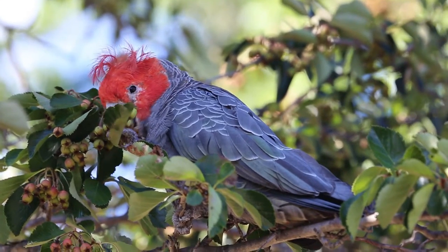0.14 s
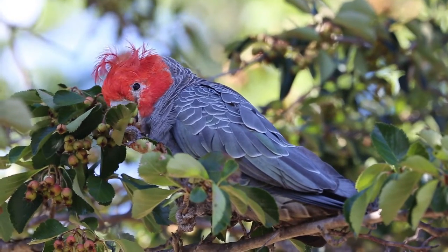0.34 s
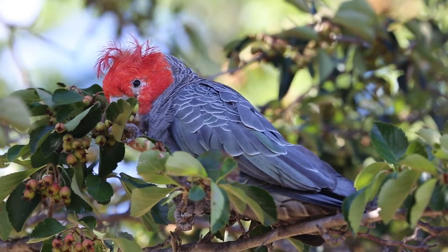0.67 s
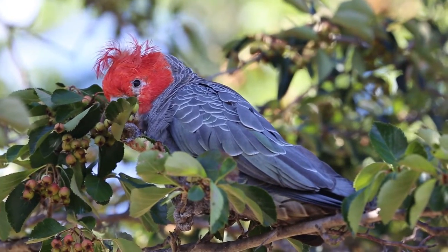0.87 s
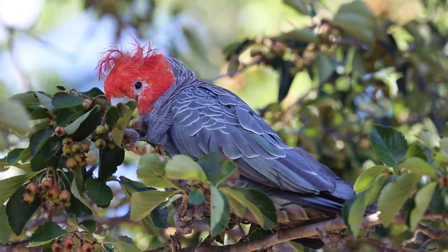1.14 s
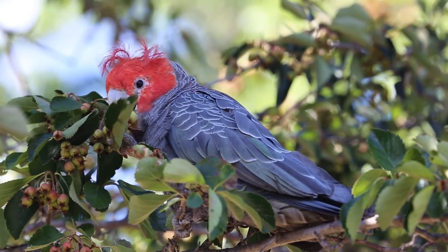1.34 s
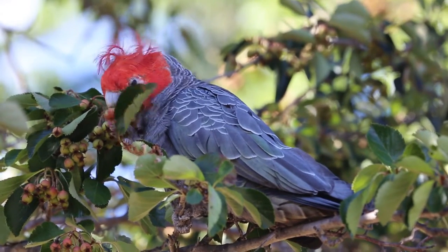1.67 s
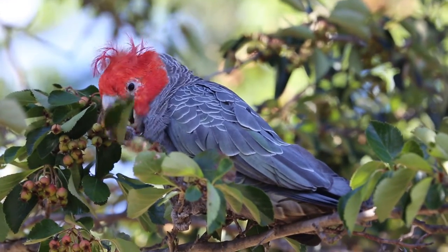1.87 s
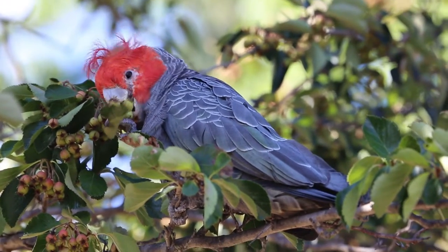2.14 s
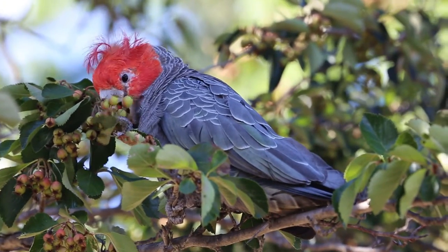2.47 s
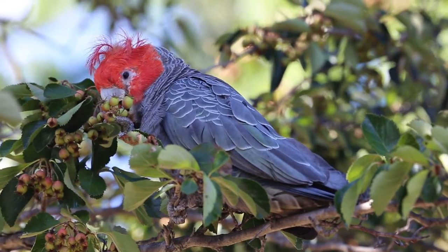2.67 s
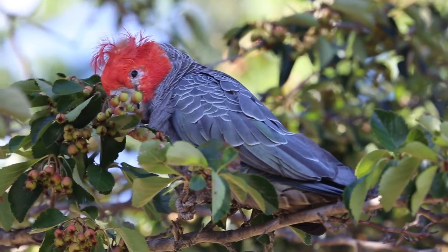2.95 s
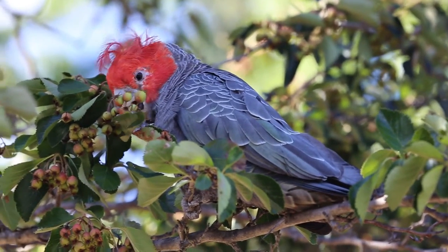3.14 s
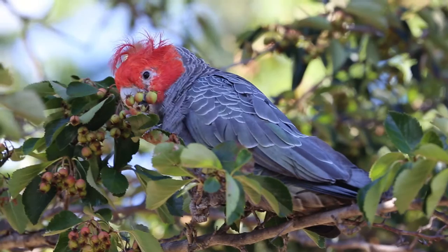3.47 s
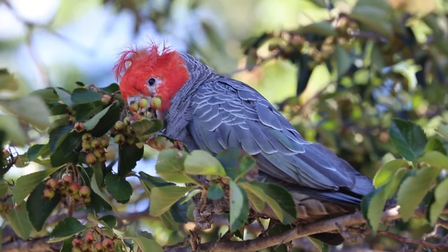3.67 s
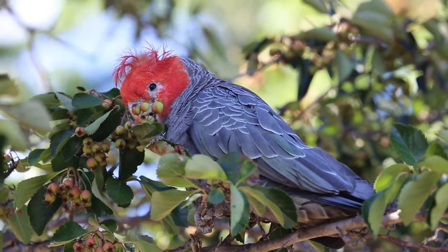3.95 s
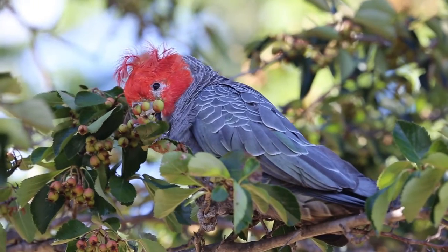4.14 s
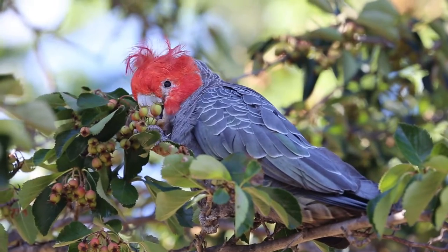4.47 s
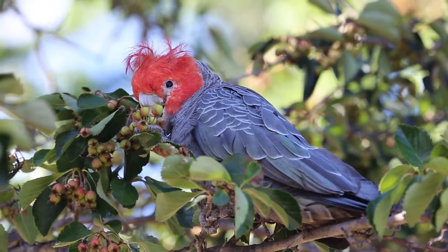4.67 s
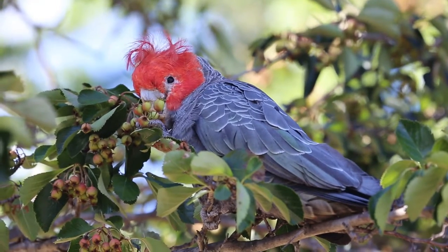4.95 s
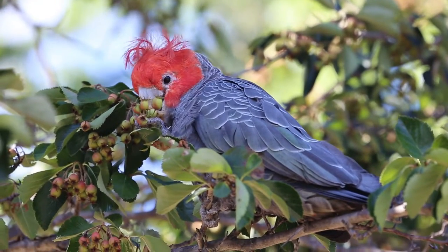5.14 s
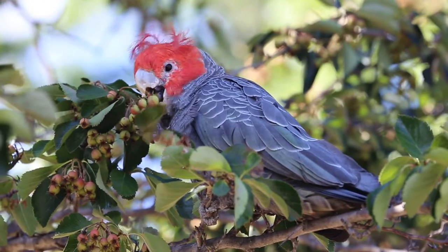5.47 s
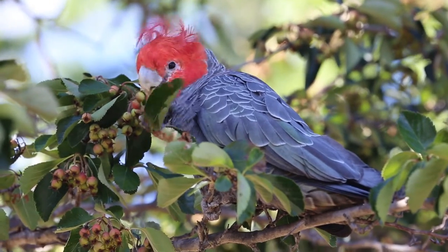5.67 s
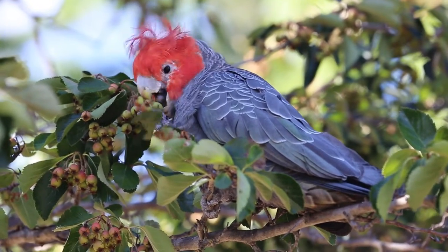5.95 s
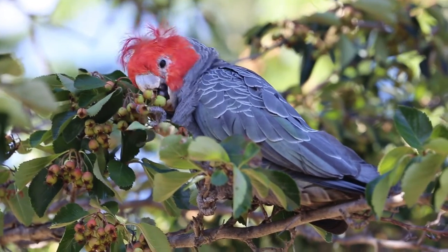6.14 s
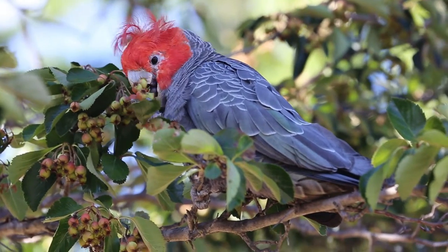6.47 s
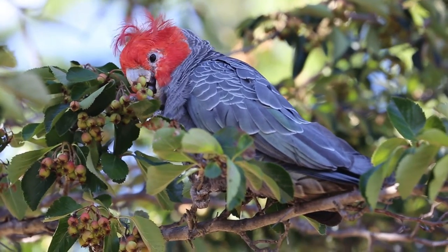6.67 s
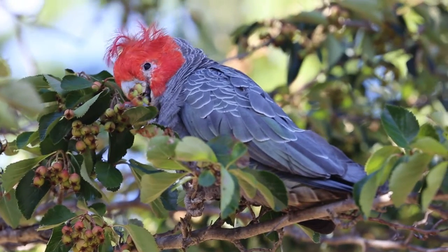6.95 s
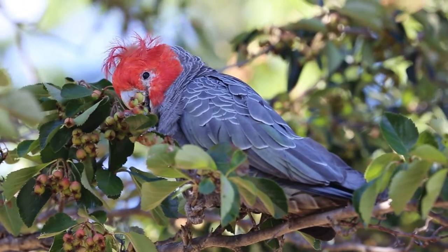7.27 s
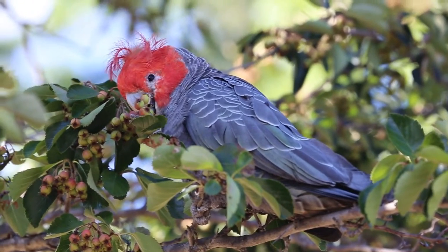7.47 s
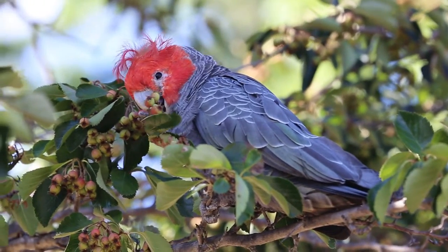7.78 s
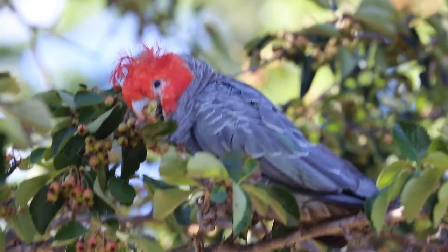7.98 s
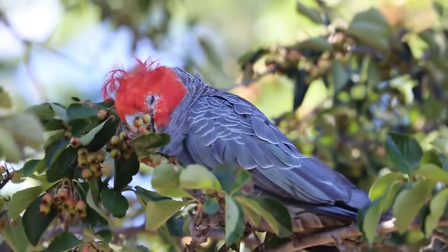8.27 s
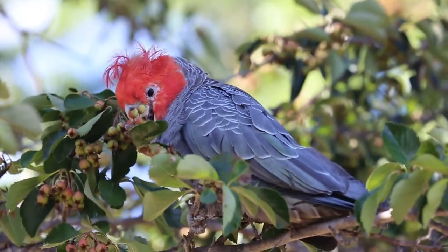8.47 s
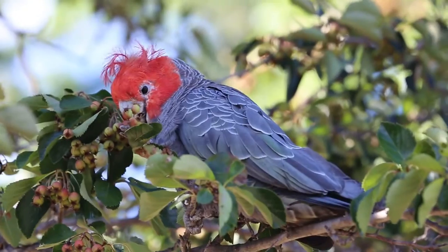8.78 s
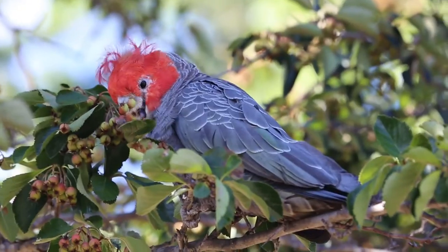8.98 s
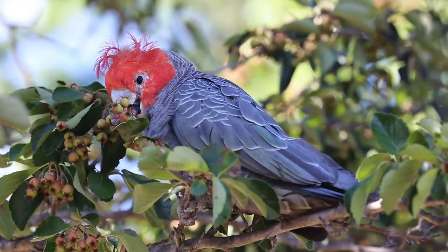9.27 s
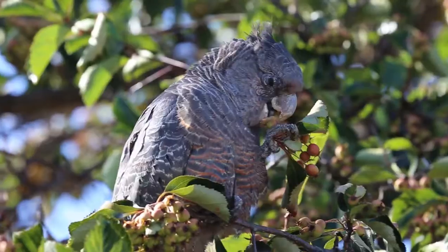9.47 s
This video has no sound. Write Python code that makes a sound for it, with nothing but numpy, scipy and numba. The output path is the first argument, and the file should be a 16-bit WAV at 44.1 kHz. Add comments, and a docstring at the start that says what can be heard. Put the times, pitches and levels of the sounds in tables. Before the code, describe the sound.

Cockatoos feed a few metres from an outdoor microphone. The opening is quiet: small bird chirps, occasional woody beak cracks, a grainy distant wash. A grating, throaty call lands near three seconds, followed by a pause with low wind buffets and clicking. From just past five seconds, rough creaking screeches follow one another closely, blurred by foliage reverberation and masking the background, which dips beneath them.

```python
"""Cockatoos rasp in a tree a few metres away: uneven slaps and turbulent air excite moving resonances.
Behind them a dulled, grainy wash of filtered noise swells and sinks: distant rasps and, between the near
calls, probably their lingering reverberation. A small bird repeats a swept tone and a pip, beaks click on
fruit as short noise bursts, and wind buffets the microphone over a soft outdoor hum of filtered noise.
Near sources gain a wall echo and a tree tail; gain control lowers the whole sound under the loud calls."""
import sys
import numpy as np
from scipy import signal
from scipy.io import wavfile
from scipy.ndimage import uniform_filter1d
from numba import njit

SR = 44100
rng = np.random.default_rng(int(sys.argv[2]) if len(sys.argv) > 2 else 0)


def output_pcm(signal):
    """Save a mono or channel-first signal as 16-bit PCM at the path in sys.argv[1].

    Samples are clipped to [-1, 1] before scaling.
    """
    pcm = np.clip(np.atleast_2d(signal).T, -1, 1) * 32767
    wavfile.write(sys.argv[1], SR, np.round(pcm).astype(np.int16))


N = 424226


def undb(db):
    """Decibel definition: amplitude ratio from a level."""
    return 10 ** (np.asarray(db) / 20)


def level(x, db):
    """Root-mean-square normalisation to a level in dB."""
    return x * undb(db) / np.sqrt(np.mean(x ** 2))


def columns(rows, edge_s=0.0013):
    """Linear interpolation of a table: its sample span, its columns per sample and a soft-edged gate."""
    s, *cols = np.transpose(rows)
    k = np.arange(max(int(s[0] * SR), 0), min(int(s[-1] * SR), N))
    gate = np.clip(np.minimum(k - k[0], k[-1] - k) / (edge_s * SR), 0, 1)
    return k, [np.interp(k / SR, s, c) for c in cols], gate


@njit
def svf(x, hz, width):
    """Second-order resonance: a state-variable band-pass with a moving centre, gain 1 there."""
    y, b, l = np.empty(len(x)), 0., 0.
    for i in range(len(x)):
        g, k = np.tan(np.pi * hz[i] / SR), width / hz[i]
        v = (b + g * (x[i] - l)) / (1 + g * (g + k))
        b, l, y[i] = 2 * v - b, l + 2 * g * v, k * v
    return y


def band(x, hz, width_hz):
    """Cascaded resonance: two equal band-passes steepen the skirts and darken the valleys."""
    hz = np.clip(hz, 20, .45 * SR) + np.zeros(len(x))
    # each pass is wider, since the cascade narrows the whole
    return svf(svf(x, hz, 1.5 * width_hz), hz, 1.5 * width_hz)


@njit
def follow(x, attack, release):
    """Envelope detection by a one-pole smoother that rises fast and falls slowly."""
    y, e = np.empty(len(x)), 1e-3
    for i in range(len(x)):
        e += (abs(x[i]) - e) * (attack if abs(x[i]) > e else release)
        y[i] = e
    return y


def walk(rate, size):
    """Slow random modulation: draws held for 1 / rate seconds and slewed, with a spread near 1."""
    k = int(SR / rate)
    held = np.repeat(rng.standard_normal(size // k + 1), k)
    return 1.2 * uniform_filter1d(held, k)[:size]


def creak(hz, jitter, scatter_db, puff):
    """Relaxation oscillation: uneven slaps of the voice membrane, each trailed by a turbulent puff of air."""
    phase = np.cumsum(hz * np.exp(jitter * walk(250, len(hz)))) / SR
    cycle = phase.astype(int)
    size = undb(scatter_db * rng.standard_normal(cycle[-1] + 1))[cycle]
    slaps = np.diff(cycle, prepend=0) * size
    # puff is the decay constant as a share of the cycle
    air = size * np.exp(-(phase - cycle) / puff) * rng.standard_normal(len(hz))
    return level(slaps, 0), level(air, 0)


def notes(tables, partials, waver):
    """Additive synthesis: stacks of sines on a pitch curve that wavers at random."""
    out = np.zeros(N)
    for rows, stack in zip(tables, partials):
        k, (hz, db), gate = columns(rows, edge_s=.008)
        phase = 2 * np.pi * np.cumsum(hz * (1 + waver * walk(150, len(k)))) / SR
        tone = sum(undb(g) * np.sin(m * phase) for m, g in stack)
        out[k] += gate * undb(db) * np.sqrt(2) * tone
    return out


def glides(rows, edge_db=-6., hook=.5):
    """Frequency glide: loudest two thirds along, with the share `hook` of the last third's change done."""
    curves = []
    for s, length, a, b, db in rows:
        loudest_hz = a + (b - a) * (2 + hook) / 3
        curves.append([(s, a, db + edge_db),
                       (s + length * 2 / 3, loudest_hz, db),
                       (s + length, b, db + edge_db / 2)])
    return curves


def rings(rows, rise_s, t60_s, octave_db):
    """Damped oscillation: short fading tones with a weak octave, from (time, peak dB, Hz)."""
    out, t = np.zeros(N), np.arange(SR // 4) / SR
    shape = (1 - np.exp(-t / rise_s)) * np.exp(-np.log(1000) * t / t60_s)
    for s, db, hz in rows:
        phase = 2 * np.pi * hz * t
        tone = np.sin(phase) + undb(octave_db) * np.sin(2 * phase)
        out[int(s * SR):][:len(t)] += undb(db) * shape / shape.max() * tone
    return out


def hum():
    """Incoherent superposition of far traffic, leaves and microphone hiss: noise bands that drift in level."""
    # relative noise density: (frequency [Hz], density [dB per Hz])
    density = [(15, -40), (25, 0), (87, 1), (796, -3.5), (1370, -2.5), (1520, -6), (1790, -5.5),
               (2050, -10), (3720, -16.5), (5280, -41), (14400, -22.5), (16000, -30)]
    table_hz, table_db = np.transpose(density)
    out, swell = 0, walk(0.22, N)
    for hz in 30 * 2 ** np.arange(0, 9.2, .5):  # half-octave steps
        db = np.interp(np.log(hz), np.log(table_hz), table_db)
        db = db + 1.0 * swell + 1.3 * walk(6, N)  # shared swell, own flicker
        out = out + undb(db) * band(rng.standard_normal(N), hz, hz * 0.5)
    return level(out, -47)


def wind():
    """Turbulent pressure on the membrane: eddies push in gusty lumps, the hardest as single thumps."""
    # strength of the gusts: (time [s], level [dB])
    gusts = [(0.0, -75.5), (3.2, -51.5), (3.46, -42), (3.62, -38), (3.77, -36), (4.06, -39.5), (4.97, -41),
             (5.36, -57.5), (5.68, -57), (6.46, -40), (6.87, -32), (7.08, -41), (7.29, -40), (7.47, -27.5),
             (7.68, -34), (7.79, -53.5), (9.19, -56.5), (9.35, -94)]
    # hardest buffets: (time [s], peak level [dB], frequency [Hz])
    buffets = [(3.45, -34.5, 116), (3.599, -18, 98), (3.852, -13.5, 110), (4.081, -16.5, 98),
               (4.261, -19.5, 99), (4.353, -25, 134), (4.468, -27, 72.7), (4.693, -27, 72),
               (4.795, -33, 75.4), (5.082, -21, 89), (5.898, -35, 72.9), (5.983, -29, 72.7),
               (6.189, -25.5, 107), (6.299, -19, 142), (6.412, -28, 165), (6.538, -27.5, 113),
               (6.996, -20.5, 141), (7.08, -27.5, 143), (7.16, -31.5, 91.5), (7.252, -14, 105),
               (7.466, -24, 158), (8.307, -24.5, 142), (8.345, -27.5, 111.4), (8.385, -25.5, 100.6)]
    k, (db,), gate = columns(gusts)
    lumps = undb(3.5 * walk(22, len(k))) * rng.standard_normal(len(k))
    rumble = band(band(lumps, 68, 89.0), 99, 140.0)
    rumble = level(rumble, 0) * undb(db)
    thumps = rings(buffets, rise_s=0.0015, t60_s=0.06, octave_db=-17.0)
    return np.pad(rumble, (k[0], N - k[-1] - 1)) + thumps


def whistles():
    """Pure-tone radiation: faint gliding sines from far away."""
    # (start [s], length [s], start frequency [Hz], end frequency [Hz], level [dB])
    tones = [(.03, 0.71, 1375, 1300, -54), (.19, 0.039, 1780, 1700, -47), (1.68, 0.18, 1040, 1070, -53),
             (2.62, 0.21, 1700, 1900, -43.5), (3.72, 0.25, 2000, 1800, -51),
             (3.95, 0.42, 1780, 1700, -57.5), (4.4, .5, 1600, 1560, -49), (4.78, 0.17, 2680, 2740, -50),
             (4.95, 0.36, 1900, 1900, -53)]
    return notes(glides(tones, edge_db=-4.), [[(1, 0)]] * len(tones), waver=.025)


def grainy_wash():
    """Absorption and scattering: a dulled, grainy wash that swells and sinks.

    It stands for distant rasps and, between the near calls, probably their lingering reverberation.
    """
    # (loudest time [s], rise [s], fall [s], level [dB], centre [Hz], treble against the rest [dB])
    swells = [(.65, 0.83, 0.37, -49.5, 2500, -44), (1.55, 0.44, 0.6, -46, 2650, -36),
              (2.621, 0.37, 0.77, -40.5, 2800, -27), (2.85, .2, .2, -42, 3000, -30),
              (3.44, .2, 0.83, -35, 2700, -40), (4.6, .6, 0.26, -33, 2880, -43),
              (5.15, 0.46, 0.7, -50.5, 3100, -23), (5.87, .5, 0.83, -33, 2950, -44),
              (6.601, 0.62, 0.54, -28.5, 3200, -28), (7.3, 0.28, 1.5, -35.5, 3050, -42),
              (8.599, 0.4, .4, -39.5, 2680, -39)]
    fade_db = 25  # each swell rises from and sinks to this far below its loudest
    out = np.zeros(N)
    for s, rise, fall, peak_db, hz, top_db in swells:
        curve = [(s - rise, peak_db - fade_db), (s, peak_db), (s + fall, peak_db - fade_db)]
        k, (db,), gate = columns(curve, edge_s=0.051)
        source = creak(np.full(len(k), 180.), jitter=0.3, scatter_db=1.5, puff=1.4)[1]
        wash = band(source, hz, 1100.0)
        wash = wash + undb(-7.0) * band(source, 2180, 680.0)
        wash = wash + undb(-18) * band(source, 3500, 1300.0)
        treble = level(band(source, 7830, 2300.0), 0)
        wash = level(band(wash, 2400, 3700.0), 0) + undb(top_db) * treble
        out[k] += gate * wash * undb(db + 1.1 * walk(9.8, len(k)))
    return out


def small_bird():
    """Frequency modulation: a quick upward sweep that hooks over at the top, then a steady fading pip."""
    # (sweep start [s], length [s], low [Hz], top [Hz], sweep level before partial gains [dB],
    #  pip frequency [Hz], pip peak level [dB])
    chirps = [(0.901, 0.041, 2060, 3190, -59, 4280, -43), (1.386, 0.041, 2170, 3310, -53, 4470, -36),
              (1.887, 0.041, 2075, 3020, -54, 4170, -33.5), (2.323, 0.051, 2085, 3410, -53.5, 4390, -44),
              (2.781, 0.042, 2225, 3370, -49, 4420, -50), (3.724, 0.048, 2070, 3470, -49.5, 4540, -36),
              (4.164, .05, 2196, 3520, -49.5, 4480, -42), (4.621, 0.049, 2080, 3210, -51.5, 4410, -33),
              (5.066, 0.05, 2030, 3510, -51.5, 4470, -37.5), (8.625, 0.053, 2060, 3040, -52.5, 4400, -51.5)]
    # sweep harmonics: (multiple, gain [dB])
    partials = [(1, 9.5), (2, 8), (3, -10)]
    curves = glides([c[:5] for c in chirps], edge_db=-2.5, hook=.4)
    sweeps = notes(curves, [partials] * len(chirps), waver=0.011)
    pips = [(s + length, db, hz) for s, length, *_, hz, db in chirps]
    return sweeps + rings(pips, rise_s=0.0017, t60_s=0.03, octave_db=-23.5)


def clicks():
    """Impulsive excitation: beaks on fruit and twigs crack for a few ms, woody centre and sharp top."""
    # (time [s], peak level of the centre [dB], centre [Hz], treble peak against it [dB])
    cracks = [(0.1144, -41, 1700, -12), (0.776, -29, 1760, -33), (0.8414, -39, 1780, -16),
              (1.7844, -40, 2360, -11), (1.8158, -37, 1770, -5.5), (2.286, -35, 1810, -33),
              (4.0854, -30, 2510, -39), (4.141, -29, 2300, -25), (4.1524, -29.5, 2280, -17),
              (4.2763, -19.5, 2350, -37), (4.3988, -21.5, 2640, -9.5), (4.4575, -18, 2250, -41),
              (5.025, -36, 1950, -15), (6.6298, -32, 3630, -29), (7.454, -19.5, 2970, -38)]
    out, t = np.zeros(N), np.arange(SR // 30) / SR
    for s, db, hz, treble_db in cracks:
        crack = np.exp(-t / .0022) * rng.standard_normal((2, len(t)))
        body, top = band(crack[0], hz, 1400.0), band(crack[1], 9500, 7000.)
        burst = body / abs(body).max() + undb(treble_db) * top / abs(top).max()
        out[int(s * SR):][:len(t)] += undb(db) * burst
    return out


def mews():
    """Harmonic series: two soft mews of integer partials on a bending pitch."""
    # one list per mew: (time [s], pitch [Hz], level before partial gains [dB])
    curves = [
        [(2.485, 509, -46.5), (2.511, 610, -33.5), (2.527, 574, -30.5), (2.555, 527, -39)],
        [(2.54, 450, -28.5), (2.58, 596, -26.5), (2.63, 520, -28), (2.67, 465, -39)],
    ]
    # one list per mew: (multiple, gain [dB])
    partials = [
        [(3, -5.5), (4, -13), (5, -11), (6, -4), (7, 0.5), (8, -6.5), (9, -13.5), (10, -25.5)],
        [(1, -13), (2, -6), (3, -15.5)],
    ]
    return notes(curves, partials, waver=.012)


def clear_notes():
    """Phase locking: the voice turns periodic at the edges of calls, and through the rasp as one nearly
    level tone and one short falling sweep."""
    # at the start or end of a call:
    # (start [s], length [s], start reference [Hz], end reference [Hz], level before partial gains [dB])
    clear = [(2.93, 0.089, 1023, 1023, -39.5), (3.345, 0.016, 1266, 1146, -31),
             (5.27, 0.061, 965, 1093, -34.5), (5.685, 0.03, 998, 1038, -36.5),
             (5.96, 0.052, 835, 915, -44.5), (6.385, 0.032, 1165, 1188, -33.5),
             (6.74, .04, 835, 990, -46.5), (7.2, 0.028, 1138, 1330, -38), (7.5, 0.05, 829, 990, -46),
             (7.96, 0.024, 1240, 1220, -33.5)]
    # shared by those notes: (multiple of the reference, gain [dB])
    clear_partials = [(.5, -9), (1, 8.5), (2, 9.5), (3, 13)]
    # through the rasp, the level tone and then the sweep:
    # (start [s], length [s], start reference [Hz], end reference [Hz], level before partial gains [dB])
    locked = [(8.14, .14, 1185, 1160, -30), (8.385, .04, 2040, 1740, -31)]
    # one list for each of the two: (multiple of the reference, gain [dB])
    locked_partials = [
        [(2, 13), (4, 0.5), (5, -9), (6, -23.5)],
        [(2, 10.5)],
    ]
    edges = notes(glides(clear, edge_db=-6.5), [clear_partials] * len(clear), waver=0.035)
    return edges + notes(glides(locked, edge_db=-9.5), locked_partials, waver=0.013)


def hiss():
    """Turbulent jet noise: air forced through a nearly closed throat, sudden at first and fading."""
    # bands before the first call; those above 8 kHz join late:
    # (start [s], end [s], centre [Hz], width [Hz], starting level [dB])
    bands = [(2.703, 2.92, 4100, 693, -38), (2.7, 2.801, 5800, 596, -59), (2.772, 2.92, 8200, 1500, -50),
             (2.772, 2.9, 10800, 3010, -55.5)]
    fade_db = -7  # change from start to end
    out = np.zeros(N)
    for start, end, hz, width_hz, db in bands:
        k, (fade,), gate = columns([(start, db), (end, db + fade_db)], edge_s=0.019)
        air = creak(np.full(len(k), 200.), jitter=0.12, scatter_db=0.0, puff=.8)[1]
        out[k] += gate * undb(fade) * level(band(air, hz, width_hz), 0)
    return out


def rasps():
    """Source-filter principle: the creak rings throat and windpipe resonances that move and tremble."""
    # effort and beak, one list per call:
    # (time [s], level [dB], 2nd resonance [Hz], 3rd resonance [Hz], 4th resonance [Hz])
    efforts = [
        [(2.92, -34, 2190, 3160, 3780), (2.966, -20.5, 2300, 3200, 3780), (3.012, -15.5, 2310, 3090, 3900),
         (3.114, -25, 2210, 2950, 3900), (3.224, -19.5, 2230, 3100, 3800), (3.364, -24.5, 2360, 2930, 3710),
         (3.39, -56, 2310, 2930, 3840)],
        [(5.245, -35.5, 2270, 2950, 3980), (5.281, -17, 2230, 2980, 3830), (5.393, -19, 2400, 2940, 3620),
         (5.465, -18, 2260, 2800, 3940), (5.529, -18.5, 2220, 2800, 3750), (5.585, -17.5, 2230, 3130, 3730),
         (5.677, -19.5, 2130, 2960, 3970), (5.725, -22, 2150, 3060, 3900)],
        [(5.96, -34, 2130, 2990, 3910), (5.968, -38, 2100, 2990, 3920), (5.992, -18, 2160, 2920, 3870),
         (6.07, -19, 2120, 2950, 3860), (6.106, -19.5, 2140, 2950, 3970), (6.39, -19.5, 2240, 3000, 3940),
         (6.424, -24, 2290, 3100, 3880), (6.44, -27, 2320, 3090, 3920)],
        [(6.73, -47, 2220, 2930, 3820), (6.786, -23.5, 2230, 2860, 3930), (6.916, -20, 2140, 2850, 3860),
         (6.982, -18.5, 2180, 3010, 3850), (7.05, -19, 2010, 3000, 3820), (7.206, -20, 2120, 2970, 3870),
         (7.25, -45, 2140, 3000, 3880)],
        [(7.5, -40.5, 2270, 2880, 3920), (7.554, -18, 2330, 3120, 4090), (7.658, -19.5, 2240, 3000, 3770),
         (7.72, -20.5, 2190, 2900, 3830), (7.828, -16.5, 2200, 2860, 3900), (7.898, -22.5, 2070, 3100, 3900),
         (7.952, -18.5, 2200, 3060, 3920), (7.995, -37.5, 2330, 3080, 3790)],
        [(8.0, -27.5, 2390, 3070, 3920), (8.086, -23, 2290, 3150, 3920), (8.252, -18.5, 2380, 3200, 3700),
         (8.39, -16.5, 2245, 3110, 3880), (8.45, -52, 2330, 3070, 3670)],
        [(8.65, -37.5, 2400, 2950, 3860), (8.73, -20, 2300, 3080, 3900), (8.854, -19, 2350, 3030, 4030),
         (9.056, -18.5, 2350, 3060, 3730), (9.124, -21.5, 2330, 3080, 3940), (9.34, -22, 2190, 2950, 3870),
         (9.35, -29, 2260, 2900, 3870)],
    ]
    # voice of each call: (mean creak rate at start [Hz], at end [Hz], unevenness [0-1],
    #  air against slaps [dB], factor on the throat widths, broad colour gain [dB], 1st resonance [dB],
    #  3rd resonance [dB], 4th resonance [dB], upper resonances [dB], top [dB])
    voices = [(264.7, 180, .1, 0.71, 1.4, -2, -13, -1.9, -7, -12.5, -40),
              (166.1, 260, .1, -0.57, 1.03, 2, -6, 2, 1, -15.5, -38),
              (232.5, 235, .09, -0.31, 1.25, 2, -8, 2, 0, -20, -27.5),
              (277.7, 325, .08, -0.58, 1.12, 2, -7.5, 0, 1.5, -12, -31),
              (210, 320, .07, 0.87, 1.23, 2.5, -14.5, 2, 0, -16, -34),
              (228.2, 225, .08, 2.07, 1.18, -1.5, -24, -1.8, -2.5, -16, -21),
              (200.8, 225, .05, 2.3, 1.22, 2, -10.5, 0.83, -5, -27, -34.5)]
    # 1st to 4th resonance before the call's factor: (width [Hz])
    throat_widths = [420, 240, 330, 380]
    # windpipe series: (multiple of half the 2nd resonance, relative gain [dB])
    windpipe = [(5, 2.5), (6, -4.5), (7, -6.5), (8, -21)]
    # broad colour under the resonances: (centre [Hz], width [Hz], relative level [dB])
    colour = [(694, 300, -23.5), (1440, 960, -15), (3030, 610, -17), (4713, 1280, -7)]
    out = np.zeros(N)
    for rows, voice_row in zip(efforts, voices):
        rate0, rate1, uneven, air_db, wide, body_db, db1, db3, db4, upper_db, top_db = voice_row
        k, (db, hz2, hz3, hz4), gate = columns(rows, edge_s=0.026)
        size = len(k)
        slaps, air = creak(np.linspace(rate0, rate1, size), jitter=uneven, scatter_db=2., puff=.45)
        voice = slaps + undb(air_db) * air
        bright = slaps + undb(air_db + 2.5) * air  # the upper bands carry more air

        def shift():
            """Moving tongue: a random change in the strength of one resonance."""
            return undb(1.8 * walk(12, size))

        mid = 0
        throat = zip((0.45 * hz2, hz2, hz3, hz4), throat_widths, (db1, 0, db3, db4))
        for j, (f, w, g) in enumerate(throat):
            trembling_hz = f * (1 + .012 * walk(35, size))
            resonance = level(band(voice, trembling_hz, wide * w), g)
            mid = mid + (-1) ** j * shift() * resonance  # neighbours have opposite signs
        body = sum(level(band(voice, f, w), g) for f, w, g in colour)
        # the upper resonances wander and flicker on their own
        upper = 0
        for m, g in windpipe:
            wandering_hz = m * hz2 / 2 * (1 + .02 * walk(10, size))
            upper = upper + undb(g + 3 * walk(14, size)) * band(bright, wandering_hz, 750)
        top = shift() * band(bright, 10020, 3400.0)
        call = mid + undb(body_db) * body + level(upper, upper_db) + level(top, top_db)
        # a side cavity swallows part of a band just below the 2nd resonance
        call = call - 0.41 * band(call, 0.783 * hz2, 260)
        # the tongue moves strength between resonances without changing the loudness
        loudness = np.sqrt(uniform_filter1d(call ** 2, SR // 20))
        out[k] += gate * undb(db) * call / loudness
    # so small a throat radiates no bass, and the air takes the very top
    return signal.sosfilt(signal.butter(3, (600, 12000), "bandpass", fs=SR, output="sos"), out)


def surroundings(x, wet_db):
    """Reflection and scattering: one smeared wall echo and a diffuse tree tail, shorter in the treble."""
    # diffuse tail: (centre [Hz], time to decay by 60 dB [s], relative level [dB])
    trees = [(1360, .5, -16), (3350, 0.45, -13), (6900, 0.1, -13)]
    echo_s, echo_db = 0.098, -21
    t, tail = np.arange(SR) / SR, 0
    for f, t60, g in trees:
        decay = np.exp(-np.log(1000) * t / t60)
        tail = tail + level(band(rng.standard_normal(SR), f, 1. * f) * decay, g)
    tail = undb(wet_db) * tail / np.sqrt(SR) * np.clip(t / 0.0061, 0, 1)
    # a burst of 60 samples smears the echo
    tail[int(echo_s * SR):][:60] += undb(echo_db) * rng.standard_normal(60) / np.sqrt(60)
    return x + signal.fftconvolve(x, tail)[:N]


def scene():
    """Linear superposition of the background, the distant sounds and the near birds."""
    background = hum() + wind()
    far = grainy_wash() + whistles()
    # the small bird sits deeper in the trees, so more of it arrives scattered
    chirping = surroundings(small_bird(), wet_db=7.0)
    near = surroundings(clear_notes() + mews() + clicks(), wet_db=-6)
    rasping = surroundings(rasps() + hiss(), wet_db=5.0)
    return (background + far + chirping + near + rasping)[None]


def record(dry):
    """Dynamic compression between a high-pass and a steep low-pass: gain eases down under loud calls."""
    heard = signal.sosfilt(signal.butter(2, 45, "high", fs=SR, output="sos"), dry)
    envelope = follow(heard[0], 1 / (0.013 * SR), 1 / (.2 * SR))  # 13 ms attack, 0.2 s release
    gain = np.minimum(undb(-24.5) / envelope, 1) ** 0.18
    stop = np.clip((9.352 - np.arange(N) / SR) / 0.0045, 0, 1)  # the sound stops short
    low_pass = signal.ellip(10, .2, 80, 15830, fs=SR, output="sos")
    return signal.sosfilt(low_pass, heard * gain * stop)


dry = scene()
out = record(dry)
output_pcm(out)
```